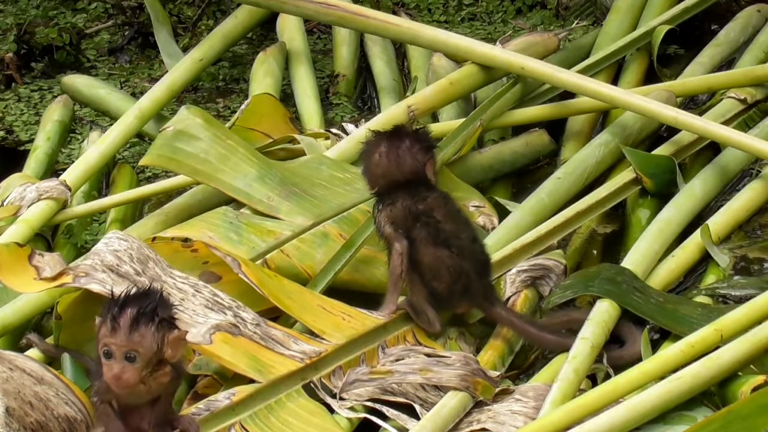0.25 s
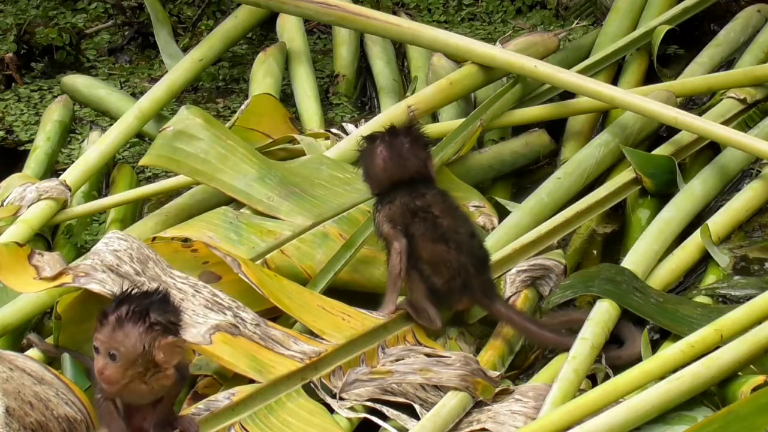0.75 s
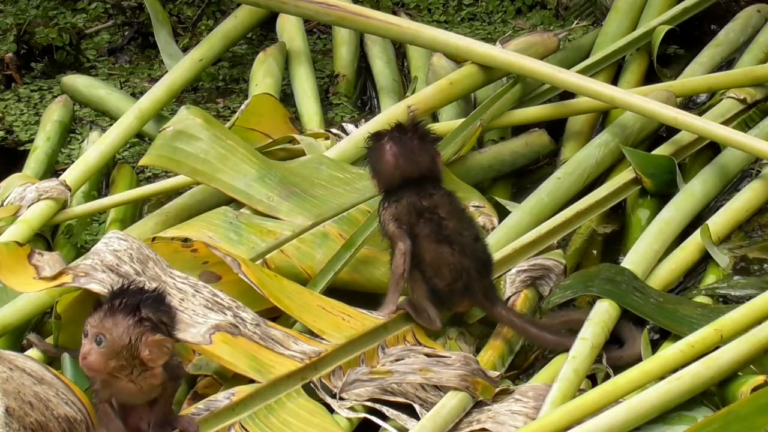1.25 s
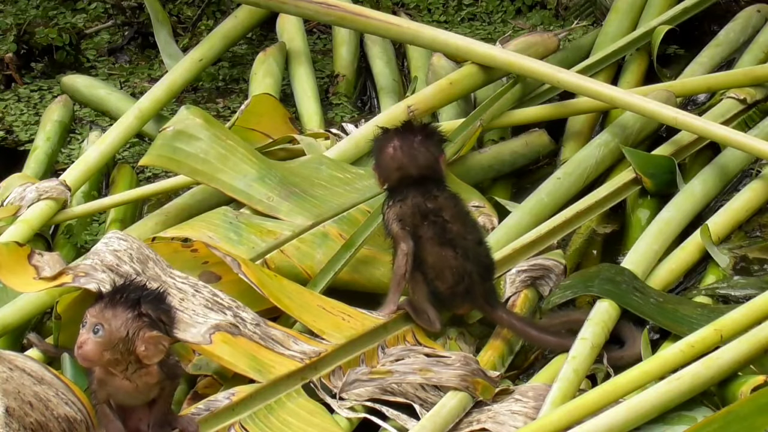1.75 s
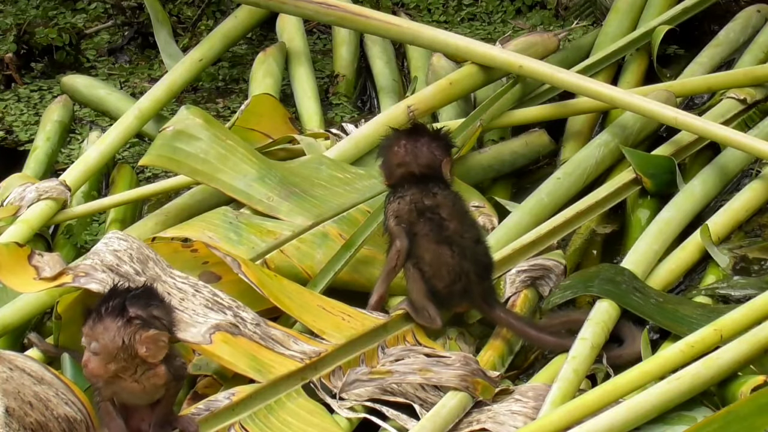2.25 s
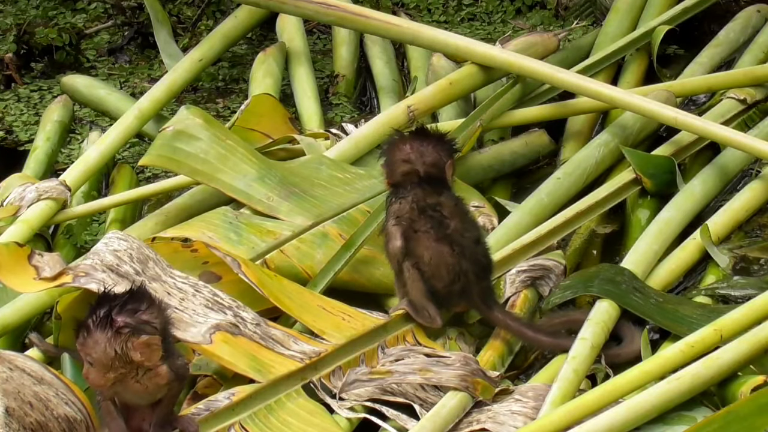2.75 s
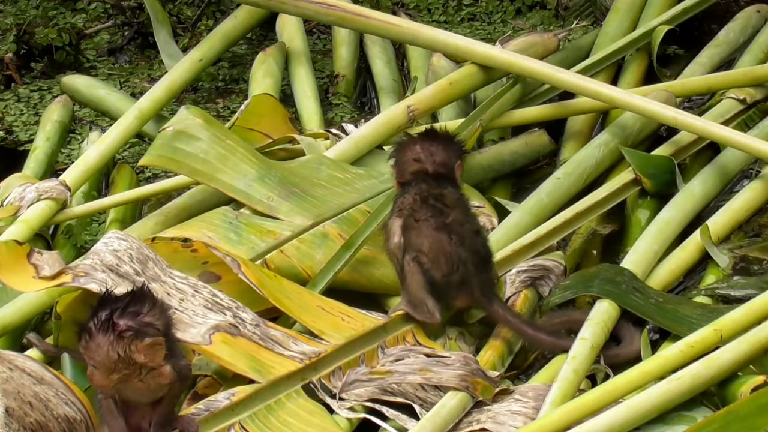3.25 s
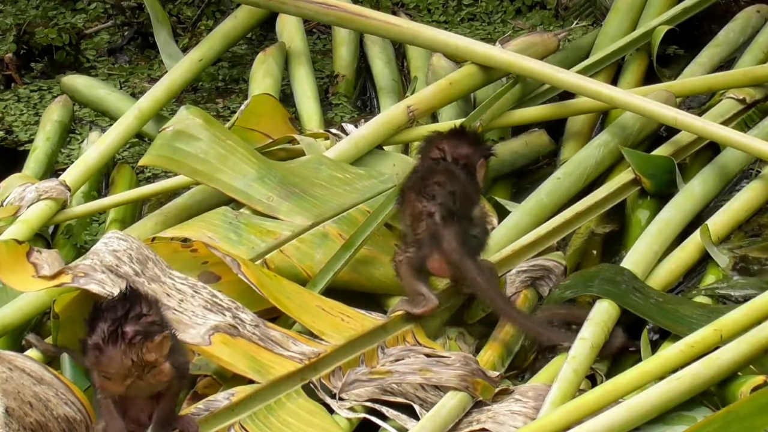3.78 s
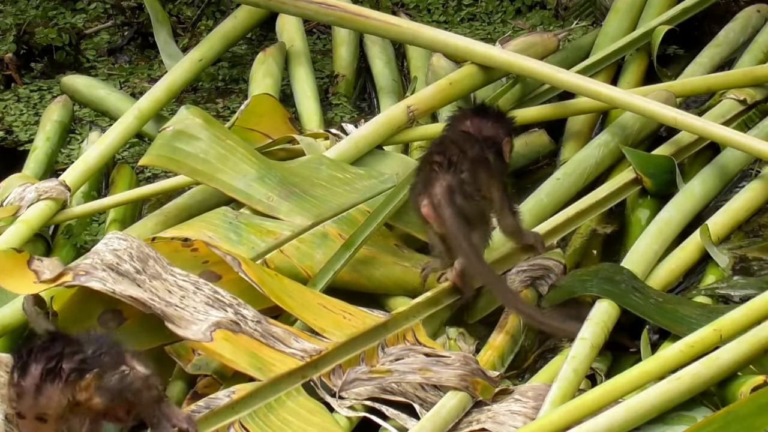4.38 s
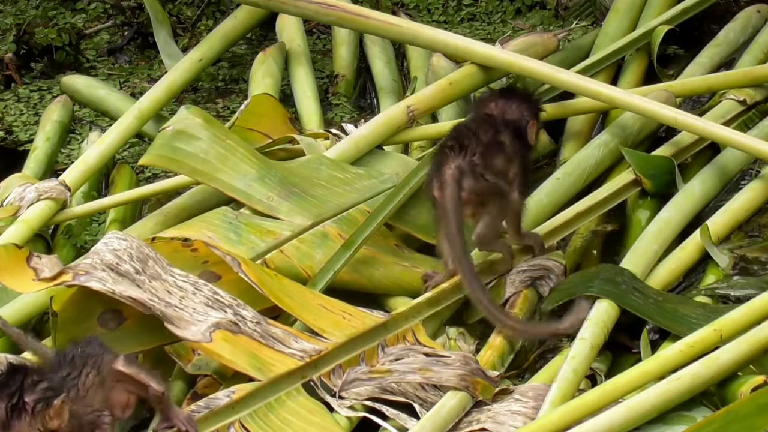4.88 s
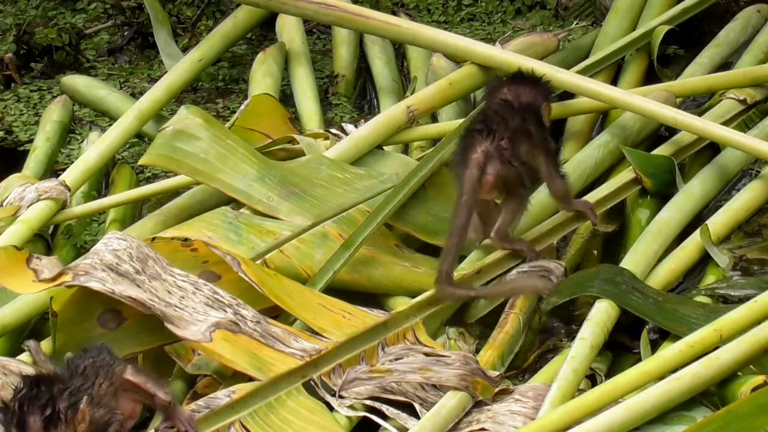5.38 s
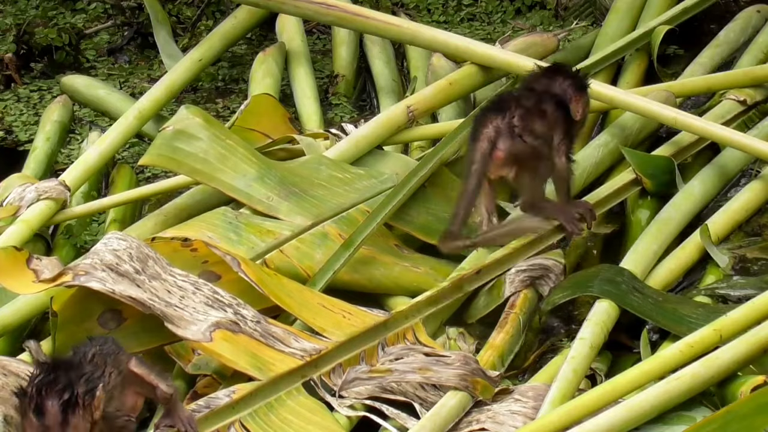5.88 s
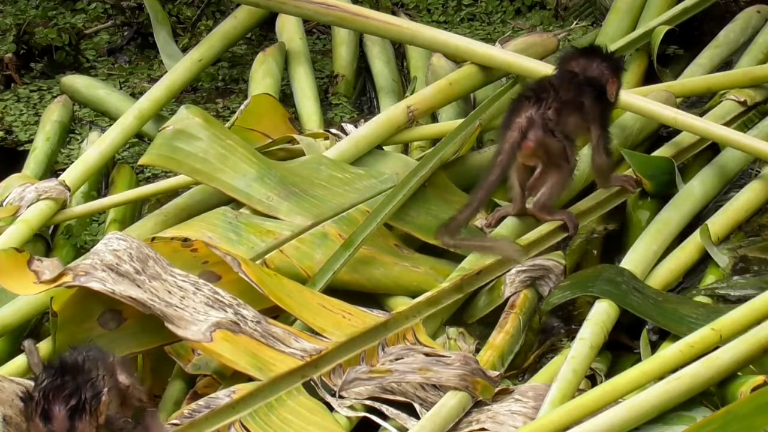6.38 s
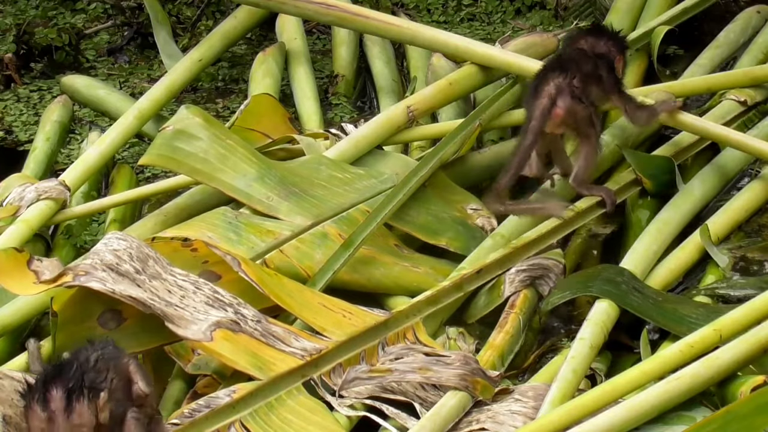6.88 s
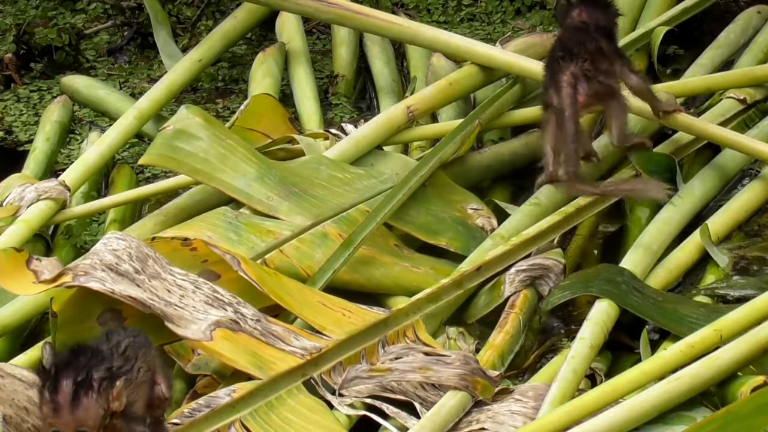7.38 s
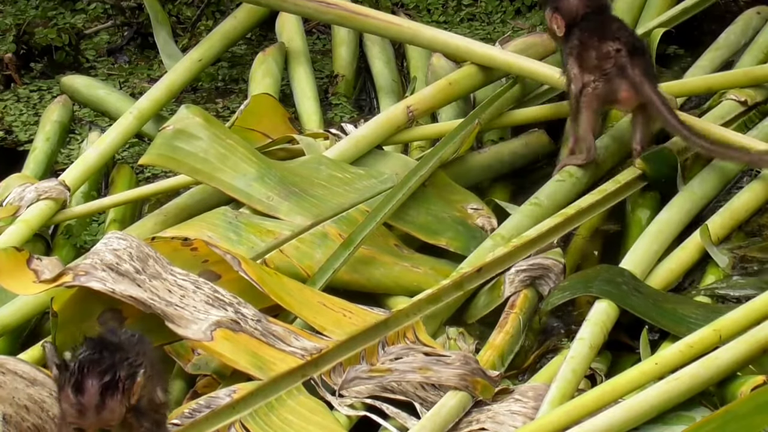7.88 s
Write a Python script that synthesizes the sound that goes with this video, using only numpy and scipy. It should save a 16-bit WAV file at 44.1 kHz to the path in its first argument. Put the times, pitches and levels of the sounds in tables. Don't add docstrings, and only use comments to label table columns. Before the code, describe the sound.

A pondside bed of distant low rumble, faint air hiss, thin high insect buzz with a fast throb, and a dim frog chorus runs throughout, heard by a small stereo camera microphone. Tiny chirps, leaf snaps and soft water gulps open it; from 0.5 to 1.0 a young monkey gives a smooth whistled cry, rising then dropping. At 2.1 comes a double-peaked squeak falling hoarsely. Leaves brush near 2.8, drops gulp near 3.3, and quick yelps follow at 3.35 and 3.7. Strong leaf snaps at 4.2, soft coos at 4.1 and 4.4, a yelp at 4.45. Twigs and leaves crackle from 4.9 to 5.2. A small yip at 5.6 precedes a loud arched squeal at 5.8. Low coos and a grunt fill 6.6 to 7.0, then a piercing short squeal at 7.1 cracks into a sob. Light rustles continue, with a clipped rising yelp at 8.1. Short echoes trail the calls.

```python
import sys
import numpy as np
from scipy import signal
from scipy.fft import rfft, irfft
from scipy.io import wavfile
from scipy.ndimage import uniform_filter1d

SR = 44100
rng = np.random.default_rng(int(sys.argv[2]) if len(sys.argv) > 2 else 0)


def volts_from_db(level):
    exponent = np.asarray(level, float) / 20
    return 10 ** exponent


def to_wav(s):
    ch = np.atleast_2d(s).T
    pcm = np.round(np.clip(ch, -1, 1) * 32767)
    wavfile.write(sys.argv[1], SR, pcm.astype(np.int16))


N = 358533


def rms_one(x):
    return x / np.sqrt(np.mean(x ** 2) + 1e-20)


def in_time(rows):
    s, *columns = np.transpose(rows)
    return [np.interp(np.arange(N) / SR, s, c) for c in columns]


def at_hz(points, hz):
    points = np.array(points)
    return np.interp(np.log(hz), np.log(points[:, 0]), points[:, 1])


def drift(rate_hz):
    r = np.exp(-2 * np.pi * rate_hz / SR)
    return rms_one(signal.lfilter([1], [1, -2 * r, r * r], rng.standard_normal(N + SR))[SR:])


# freq_hz, likeness (0-1)
LIKENESS = [(30, 0.85), (150, 0.94), (300, 0.7), (700, 0.34), (2000, 0.94), (6000, 1), (9000, 0.66),
            (12000, 0.031), (15500, 0.12)]
# freq_hz, left_over_right_db
LEAN = [(30, -4), (125, -3.5), (250, -2), (500, -1), (1200, 2.7), (3000, 2.5), (6000, -1.5), (12000, -1)]


def coloured(spectrum):
    hz = np.maximum(np.arange(N // 2 + 1) * SR / N, 5)
    mid, side = rfft(rng.standard_normal((2, N)))
    alike = np.clip(at_hz(LIKENESS, hz), 0, 1)
    lean = volts_from_db(at_hz(LEAN, hz) / 2)
    mid, side = np.sqrt(1 + alike) * mid, np.sqrt(1 - alike) * side
    pair = [(mid + side) * lean, (mid - side) / lean]
    inside = (hz > spectrum[0][0]) & (hz < spectrum[-1][0])
    return rms_one(irfft(pair * volts_from_db(at_hz(spectrum, hz)) * inside, N))


def buzz(hz, width_hz):
    phase = 2 * np.pi * np.cumsum(hz + np.zeros(N)) / SR
    return rms_one(drift(width_hz) * np.cos(phase) + drift(width_hz) * np.sin(phase))


def unfold(calls, way):
    return [[(s + share * length, bend * (start_hz + share * (end_hz - start_hz)), db + effort_db, pressed)
             for share, bend, effort_db, pressed in way]
            for s, length, start_hz, end_hz, db in calls]


# start_s, pitch_hz, effort_db, pressed_db_per_octave
WHISTLE = [(.475, 1208, -48.5, -16), (.55, 1219, -48, -7), (.62, 1337, -47.5, 4.5), (.66, 1380, -42.5, -5),
           (.7, 1491, -40, 2), (.8, 1526, -36, 3.5), (.9, 1549, -35, 0), (.96, 1513, -40.5, 3),
           (1.0, 1306, -56, -8)]
# freq_hz, gain_db
PURSED = [(1400, -0.5), (3000, -1.5), (4650, -6), (5300, -17), (6100, -26), (7700, -16), (9200, -28.5),
          (10800, -18), (12300, -23)]


def whistle():
    return [(WHISTLE, PURSED)]


# start_s, pitch_hz, effort_db, pressed_db_per_octave
SCREAMS = [
    [(2.122, 2750, -54, 5), (2.145, 3274, -38, -4), (2.17, 2334, -37, 3.5), (2.204, 3420, -30, -0.5),
     (2.22, 2930, -30, 7), (2.24, 2572, -29.5, 2.5), (2.263, 2410, -28.5, 8), (2.285, 1776, -31, 1),
     (2.31, 954, -51.5, -33)],
    [(5.79, 1816, -45, -10), (5.8, 2560, -37.5, -0.5), (5.825, 3070, -30.5, 4), (5.838, 2687, -27, 10),
     (5.858, 2775, -22, 6), (5.876, 2702, -29, 0), (5.893, 2150, -26.5, 6.5), (5.935, 1436, -37, -1),
     (5.973, 1153, -42.5, -13)],
    [(7.084, 886, -57.5, 3), (7.1, 2432, -30.5, -8), (7.109, 2753, -33, -8), (7.125, 2767, -28, 6.5),
     (7.14, 3104, -22, -2), (7.153, 3137, -24, -11), (7.163, 3186, -24, -5), (7.174, 2330, -36, 2),
     (7.19, 1425, -29, 12)],
]
# freq_hz, gain_db
SCREAM_MOUTHS = [
    [(1200, -15), (2500, -2), (3400, 13), (5200, -5.5), (7700, 8), (9000, 2), (10200, 2.5), (12500, 0.5)],
    [(1200, -6), (2800, 4), (4200, 3.5), (5400, -3), (8200, 5.5), (9600, -8), (11200, 2), (12500, -6)],
    [(1200, 3), (2300, -3.5), (3100, 1.5), (5400, -7), (6300, 12.5), (8300, -2.5), (11200, -4), (13500, -8)],
]


def screams():
    return list(zip(SCREAMS, SCREAM_MOUTHS))


# start_s, pitch_hz, effort_db, pressed_db_per_octave
YELPS = [
    [(3.329, 2660, -36, 7), (3.333, 2730, -26, 11), (3.337, 3070, -46, 6), (3.341, 3760, -24, -6),
     (3.346, 3470, -34, -10), (3.354, 3250, -52, -12)],
    [(3.358, 2130, -22.5, 19), (3.372, 1554, -47.5, -8), (3.39, 893, -42, 3)],
    [(3.402, 2684, -36, -4), (3.412, 2943, -33, -8), (3.42, 2373, -31, 11), (3.428, 1754, -37.5, -6),
     (3.44, 1217, -37.5, -6.5), (3.455, 905, -45, -29)],
    [(3.702, 874, -44, -23), (3.72, 722, -44, -11), (3.74, 1520, -51, -14), (3.758, 2190, -42.5, 0),
     (3.77, 1840, -40.5, -2.5), (3.785, 1200, -51, -23)],
    [(4.425, 2012, -45, 3), (4.445, 1795, -42, -5), (4.455, 1930, -38, 5), (4.464, 2695, -30.5, -3.5),
     (4.474, 2730, -36, 0), (4.485, 2325, -28.5, -3), (4.5, 1930, -34, 6), (4.52, 1185, -40, -9),
     (4.538, 830, -44, -37)],
    [(8.112, 896, -53.5, -11), (8.123, 2150, -44.5, -2), (8.13, 2540, -37, 2)],
]
# freq_hz, gain_db
YELP_MOUTHS = [
    [(1200, -6), (2700, -1), (3700, 2), (5500, 7), (7000, -2), (8300, 13), (11000, -7), (12500, -12)],
    [(1000, -5), (2000, -3.5), (4100, 2.5), (6000, -4), (8200, 6), (9600, -7), (11000, -12), (12500, -18)],
    [(1000, -1.5), (2000, -3), (2900, 0), (4300, 7), (5700, -0.5), (8400, 12), (10000, -8), (12500, -6)],
    [(800, 0), (2100, 7), (4200, 5), (5200, -21), (8000, 6), (9600, 3), (11000, 4), (12500, -10)],
    [(1000, -3), (2600, 1), (4300, 5), (5600, -14), (7600, 10.5), (9200, 1.5), (10800, 3), (12500, -8)],
    [(1200, -8), (2500, 4), (3800, -9), (5000, -23), (7600, 12), (9600, 5), (11500, 10), (14000, -2)],
]


def yelps():
    return list(zip(YELPS, YELP_MOUTHS))


# start_s, pitch_hz, effort_db, pressed_db_per_octave
SOB = [(7.195, 1427, -38, -4), (7.207, 1254, -38.5, 10), (7.23, 1446, -38.5, 2.5), (7.245, 1260, -48, -4),
       (7.26, 990, -55, -14)]
# start_s, length_s, start_hz, end_hz, effort_db
CHIRPS = [(.334, 0.0166, 1330, 1300, -53), (4.388, 0.0247, 2310, 2700, -49.5),
          (7.938, 0.015, 3480, 3750, -54), (.107, 0.013, 940, 1000, -53), (6.39, 0.013, 2400, 1900, -58.5)]
# length_share, pitch_ratio, effort_db, pressed_db_per_octave
CHIRP_WAY = [(0, 1.0, 4, -1), (.5, 1.1, -3, 5.5), (1, 1.0, -2.5, -14)]
# freq_hz, gain_db
THROAT = [(1200, 3.5), (2800, 1), (4000, 3), (4700, -5), (5900, -11), (8000, 5.5), (9600, -4), (11000, -8),
          (15500, -30)]
LIPS = [.8, 1.3, 1.04, 1.05, 0.96, 1.3]


def sob_and_chirps():
    mouths = [np.array(THROAT) * [ratio, 1] for ratio in LIPS]
    return list(zip([SOB] + unfold(CHIRPS, CHIRP_WAY), mouths))


# start_s, pitch_hz, effort_db, pressed_db_per_octave
YIP = [(5.573, 1710, -51.5, -4), (5.59, 1398, -42, 4), (5.61, 1470, -41.5, -0.5), (5.62, 1330, -45, 7),
       (5.63, 1090, -57, -4)]
# freq_hz, gain_db
BARED = [(1400, -2), (2800, -11), (4300, -11), (6000, -26), (8000, 3), (9300, 5), (11000, -6), (15500, -36)]
# start_s, length_s, start_hz, end_hz, effort_db
GRUNTS = [(6.894, 0.054, 1520, 1318, -45)]
# length_share, pitch_ratio, effort_db, pressed_db_per_octave
GRUNT_WAY = [(0, 1.0, 1.5, -0.14), (.27, .905, 3.5, -0.097), (.76, 1.04, 0.5, -.5), (1, .97, 0, -1.3)]
# freq_hz, gain_db
AJAR = [(1400, -4), (2800, -11), (4300, -16.5), (5500, -22), (7800, -2), (9500, -19), (15500, -24)]


def yip_and_grunt():
    return list(zip([YIP] + unfold(GRUNTS, GRUNT_WAY), (BARED, AJAR)))


# start_s, length_s, start_hz, end_hz, effort_db
COOS = [(4.137, 0.071, 668, 641, -51.5), (4.397, 0.067, 666, 680, -51), (6.616, 0.085, 643, 582, -48.5),
        (6.792, 0.144, 604, 640, -49), (7.016, 0.049, 696, 657, -48.5)]
# length_share, pitch_ratio, effort_db, pressed_db_per_octave
COO_WAY = [(0, 0.99, 4.5, -2.5), (.42, 0.93, 2, 1), (1, 1.0, -10, -5)]
# freq_hz, gain_db
SHUT = [(600, -1), (1200, -3.5), (1800, -59), (3000, -26.5), (7800, -16), (15500, -45)]


def coos():
    return [(rows, SHUT) for rows in unfold(COOS, COO_WAY)]


# centre_s, half_length_s
BREAKS = [(3.366, 0.01), (4.511, 0.0073), (5.915, 0.0183), (7.195, 0.015)]


def sing(rows, mouth, ragged, shake, breath, flutter, turn):
    jitter, hoarse_db, half_db = 0.0066, -3, -24
    edge_s, port_turn_rad = 0.00062, 0.99
    breath_hz = 7600
    knee = 2.64
    roll_off_db_per_octave, glide_loss_db = 4.5, 1.58
    top_hz, top_loss_db_per_khz = 12500, 5
    flutter_db, ragged_db = 1.6, 7

    s, hz, effort_db, pressed = np.transpose(rows)
    span = np.arange(int(s[0] * SR), min(int((s[-1] + edge_s) * SR), N))
    t = span / SR
    pitch = uniform_filter1d(np.interp(t, s, hz), size=330, mode="nearest")
    strain = np.clip(np.abs(np.gradient(np.log(pitch)) * SR) / 12, .06, 1)
    crack = sum(np.exp(-((t - at) / length) ** 4) for at, length in BREAKS)
    wobble = (jitter * strain + 0.07 * crack) * shake[span]
    phase = 2 * np.pi * np.cumsum(pitch * (1 + wobble)) / SR

    order = np.arange(1, 12)[:, None]
    slope = np.interp(t, s, pressed)
    colour = at_hz(mouth, order * pitch) + slope * np.log2(np.minimum(order, knee))
    colour = colour - roll_off_db_per_octave * np.log2(np.maximum(order / knee, 1))
    colour = colour - glide_loss_db * order * strain
    if ragged > 0:
        colour = colour - top_loss_db_per_khz * np.maximum(order * pitch - top_hz, 0) / 1000
    effort = np.interp(t, s, effort_db)
    even = effort - 10 * np.log10(np.sum(volts_from_db(2 * colour), axis=0))

    hiss_db = even + at_hz(mouth, breath_hz) + hoarse_db
    hiss_db = hiss_db + slope * np.log2(np.minimum(breath_hz / pitch, knee))
    puffs = 1 + 0.1 * np.cos(phase)
    voice = volts_from_db(hiss_db - 14) * (strain + 0.21 * crack) * breath[:, span] * puffs
    voice = voice + volts_from_db(effort + half_db) * np.minimum(crack, 1) * np.sin(phase / 2)

    apart = np.array([[.5], [-.5]])
    for k in range(1, 12):
        late = span - k * SR // 10
        unrest = 0.029 + 0.88 * min(k, knee) * strain
        db = even + colour[k - 1] + flutter_db * unrest * flutter[k % 4][span]
        db = db + (k > 1) * ragged * ragged_db * shake[late] + (k > 3) * 4.2 * turn[late]
        shift = apart * port_turn_rad * (k * pitch / 12000) ** 3 * turn[span]
        level = np.sqrt(2) * volts_from_db(db + apart * at_hz(LEAN, k * pitch))
        voice = voice + level * np.sin(k * phase + k * k + shift) * (k * pitch < 15000)
    edges = np.clip(np.minimum(t - s[0], s[-1] + edge_s - t) / edge_s, 0, 1)
    return span, voice * edges


# start_s, level_db
FAINT_COO = [(.515, -69), (.53, -55), (.56, -47), (.58, -79)]


def faint_coo():
    t = np.arange(N) / SR
    level = volts_from_db(in_time(FAINT_COO)[0]) * (t > FAINT_COO[0][0]) * (t < FAINT_COO[-1][0])
    return level * (np.sin(2 * np.pi * 1850 * t) + 0.62 * np.sin(2 * np.pi * 3085 * t))


RAGGED = [.55, .35, .2, .15, .5, .35, .55, .55, .2, .5, .3, .5, .3, .2, .2]


def monkeys():
    out = np.zeros((2, N))
    shake, turn = drift(288), drift(39)
    flutter = [drift(74) for k in range(4)]
    breath = coloured([(2500, -23), (5000, -30), (7500, 0), (11000, 8), (15500, -4)])
    wide = screams() + yelps() + sob_and_chirps()
    calls = [(rows, mouth, ragged) for (rows, mouth), ragged in zip(wide, RAGGED)]
    calls += [(rows, mouth, .2) for rows, mouth in yip_and_grunt()]
    calls += [(rows, mouth, 0) for rows, mouth in whistle() + coos()]
    for rows, mouth, ragged in calls:
        span, voice = sing(rows, mouth, ragged, shake, breath, flutter, turn)
        out[:, span] += voice
    return out + faint_coo()


# peak_s, level_db, length_s
SWISH = [(0.563, -52.5, 0.0087), (0.64, -54, 0.014), (.345, -63, 0.011), (2.713, -52.5, 0.021),
         (2.862, -52, 0.013), (3.175, -53, 0.016), (3.694, -62, 0.029), (3.753, -52.5, 0.029),
         (3.908, -64, 0.023), (4.047, -56.5, 0.02), (4.205, -56.5, 0.057), (4.273, -50, 0.019),
         (4.646, -54, 0.046), (4.83, -57.5, 0.035), (4.943, -57, 0.029), (5.016, -49, 0.023),
         (5.058, -57, 0.028), (5.096, -46.5, 0.015), (5.144, -44.5, 0.02), (5.304, -64, 0.098),
         (5.62, -46.5, 0.031), (5.692, -54, 0.013), (6.29, -61, 0.014), (6.392, -65, 0.061),
         (6.752, -63, 0.31), (7.225, -49, .035), (7.612, -64, 0.018), (7.761, -47.5, 0.036),
         (7.972, -55, 0.033), (8.068, -60, 0.037)]
# freq_hz, level_db_per_hz
LEAF = [(710, 3.5), (1200, -1), (1590, -12.5), (2680, -7.5), (3730, -8), (5150, -11.5), (7170, 0),
        (8420, 3), (15500, -16.5)]


def swishes(grains_per_s=2500, grain_db=5.5):
    t = np.arange(N) / SR
    level = sum(volts_from_db(db) * np.exp(-((t - s) / length) ** 2) for s, db, length in SWISH)
    grain_level = volts_from_db(grain_db * np.minimum(rng.exponential(1, N), 4))
    grains = (rng.random(N) < grains_per_s / SR) * grain_level
    density = signal.lfilter([1], [1, -.97], grains)
    return level * rms_one(coloured(LEAF) * np.sqrt(0.49 + density))


# start_s, peak_db, low_part_db
SNAPS = [(.107, -52, 8), (.334, -46, 7), (.346, -48, 9), (6.431, -52, 6), (0.4556, -42, -8),
         (0.57, -36, -3), (0.632, -47, 1), (0.961, -36.5, -9), (3.147, -34, -7), (4.032, -36, -8),
         (4.193, -45, -15), (4.207, -40, -8), (4.228, -47, -15), (4.237, -48, -12), (4.311, -41, -4),
         (6.381, -44, -15), (6.39, -41, 2), (5.696, -42, -20), (8.051, -46, 8), (0.499, -42, 3),
         (4.214, -23.5, -14.5), (4.256, -36.5, -2), (5.005, -30, -19), (5.083, -32.5, 5),
         (5.1374, -20.5, -6), (5.1822, -30, -9), (5.687, -26.5, -25), (6.359, -39, -4), (6.761, -40, -22),
         (6.776, -35, -7), (7.446, -57, -11), (7.612, -40, -4), (7.698, -38.5, -3), (7.823, -34, -22),
         (8.02, -40, -2)]


def snaps(decay_s=0.0033):
    out = np.zeros((2, N))
    high = coloured([(4000, -14.0), (7500, 15.5), (10000, 10.0), (15800, -19.0)])
    low = coloured([(700, 19.5), (2000, -7), (4500, 12.0)])
    after = np.arange(int(8 * decay_s * SR)) / SR
    shape = np.minimum(after / decay_s / 0.34, 1) * np.exp(-after / decay_s)
    for s, db, low_db in SNAPS:
        span = slice(int(s * SR), int(s * SR) + len(after))
        out[:, span] += volts_from_db(db - 9) * shape * (high[:, span] + volts_from_db(low_db) * low[:, span])
    return out


# start_s, peak_db
TICKS = [(4.9025, -32), (5.009, -42), (5.029, -51), (5.044, -47), (5.123, -45), (5.141, -38), (5.183, -41),
         (5.274, -44.5), (4.257, -46), (7.449, -50)]


def ticks(decay_s=0.0013):
    out = np.zeros((2, N))
    crisp = coloured([(1000, -13), (4000, -6), (5200, -11), (8000, 1), (15800, -6)])
    after = np.arange(int(0.0264 * SR)) / SR
    for s, db in TICKS:
        span = slice(int(s * SR), int(s * SR) + len(after))
        out[:, span] += volts_from_db(db) * np.exp(-after / decay_s) * crisp[:, span]
    return out


# start_s, peak_db, pitch_hz
GULPS = [(0.352, -59, 483), (0.414, -55, 495), (0.482, -53, 452), (0.557, -52, 455), (0.629, -56, 517),
         (3.264, -61, 640), (3.292, -50.5, 403), (2.95, -59, 520), (3.052, -63.5, 900), (5.606, -51.5, 547),
         (5.675, -54, 344), (5.786, -65, 790)]


def gulps(ring_s=0.0069, fall=0.36):
    out = np.zeros(N)
    after = np.arange(int(.06 * SR)) / SR
    for s, db, hz in GULPS:
        phase = 2 * np.pi * np.cumsum(hz * (1 + fall * np.exp(-after / ring_s))) / SR
        shape = after / ring_s * np.exp(-after / ring_s)
        start = int(s * SR)
        out[start:start + len(after)] += volts_from_db(db + 18.5) * shape * np.sin(phase)
    return out


# start_s, level_db, start_hz,
# end_hz, length_s
BIRDS = [(2.121, -42, 3640, 3890, 0.0087), (3.569, -57, 2355, 2220, 0.029), (3.948, -63, 2340, 2260, 0.04),
         (5.373, -58.5, 1570, 1460, 0.015), (6.429, -46, 2320, 3030, 0.0052),
         (7.084, -39, 2490, 2370, 0.0087), (7.443, -60, 2170, 2070, 0.029), (6.129, -65, 3000, 3000, 0.043),
         (6.178, -61, 3020, 2980, .02), (6.205, -61, 2840, 2800, 0.059), (6.26, -66, 3050, 2950, .05),
         (7.22, -46, 2860, 2780, 0.024)]


def birds():
    out, waver, flicker = np.zeros(N), drift(100), drift(32)
    for s, db, start_hz, end_hz, length in BIRDS:
        span = np.arange(int(s * SR), int((s + length) * SR))
        hz = np.linspace(start_hz, end_hz, len(span)) * (1 + 0.025 * waver[span])
        phase = 2 * np.pi * np.cumsum(hz) / SR
        out[span] += volts_from_db(db + 4.9 * flicker[span]) * np.hanning(len(span)) ** 0.23 * np.sin(phase)
    return out


# start_s, length_s, start_hz, end_hz, level_db
CICADA = [(-.1, 0.68, 5880, 6140, -67), (0.504, 0.4, 5840, 6150, -67), (0.999, 0.48, 5870, 6290, -69),
          (1.556, 0.83, 5770, 6180, -61.5), (2.2, 0.37, 6200, 6230, -65), (2.63, 0.89, 5830, 5650, -67.5),
          (3.45, 1.6, 5910, 5940, -63), (4.95, 1.44, 5980, 5820, -65.5), (6.42, 0.62, 5800, 6030, -66),
          (7.2, 0.81, 5870, 5620, -69)]


def cicada(swell_s=0.17, fade_s=0.24, rest_db=-71):
    t = np.arange(N) / SR
    glide, level_db = [], rest_db
    for s, length, start_hz, end_hz, db in CICADA:
        glide += [(s, start_hz), (s + length, end_hz)]
        swell = np.minimum((t - s) / swell_s, (s + length - t) / fade_s)
        level_db = level_db + (db - rest_db) * np.clip(swell, 0, 1)
    hz, = in_time(glide)
    return volts_from_db(level_db + 5.4 * drift(3.55)) * buzz(hz + 70 * drift(2.6), width_hz=140)


def cricket():
    throb = np.sin(2 * np.pi * np.cumsum(9.1 + 0.84 * drift(0.5)) / SR - 1.2)
    pulse = np.clip(0.85 + 0.25 * throb, 0, 2)
    return volts_from_db(-68 + 1.0 * drift(3.3)) * pulse * buzz(7340, width_hz=85)


def katydids():
    return volts_from_db(-99.0 + 12.0 * drift(2.1)) * buzz(8400, width_hz=230)


# start_s, level_db
FROGS = [(0, -88), (.33, -67.5), (2.0, -72), (2.5, -66), (3.5, -71.5), (4.35, -66), (5.3, -72.5),
         (6.8, -74), (7.5, -98), (7.62, -63), (8.13, -64.5)]


def frogs():
    level = volts_from_db(in_time(FROGS)[0] - 2 + 3 * drift(9))
    return level * (buzz(2030, width_hz=150) + .6 * buzz(4250, width_hz=200))


# start_s, level_db
RUMBLE = [(0.0, -36.5), (2.08, -37.5), (7.61, -37.5), (8.13, -36.5)]
# freq_hz, level_db_per_hz
LOW = [(12, -66), (20, -7), (34, -23), (57, -1), (107, -3.5), (146, -0.5), (229, -7.5), (285, -13),
       (401, -20), (619, -27), (665, -27.5), (1500, -42.5), (1950, -57), (3300, -120)]


def rumble():
    return volts_from_db(in_time(RUMBLE)[0]) * coloured(LOW)


# freq_hz, level_db_per_hz
AIR = [(710, 4.5), (1200, -8.5), (1620, -7), (1950, 0), (2780, -7.5), (4060, -5.5), (5150, -12.5),
       (7350, -4.5), (7840, -3), (14800, -13), (15800, -5)]


def air(level_db=-62):
    return volts_from_db(level_db + .7 * drift(0.43)) * coloured(AIR)


def thicket(x, t60_s=0.16, first_s=0.00037, wet_db=-5.0, alike=0.91, bank_t60_s=0.3, bank_db=-8):
    after = np.arange(int(.4 * SR)) / SR
    sparse = rng.random((3, len(after))) < .2
    shared, *own = rng.standard_normal((3, len(after))) * sparse
    echoes = shared * np.sqrt(alike) + np.array(own) * np.sqrt(1 - alike)
    echoes = echoes * volts_from_db(-60 * after / t60_s) * np.clip(after / first_s - .3, 0, 1)
    stalk_band = signal.butter(2, [2000, 11000], "band", fs=SR, output="sos")
    echoes = signal.sosfilt(stalk_band, echoes)
    bank_band = signal.butter(1, [2500, 3300], "band", fs=SR, output="sos")
    bank = signal.sosfilt(bank_band, shared[::-1] * volts_from_db(bank_db - 60 * after / bank_t60_s))
    echoes = echoes + bank * np.clip(after / 0.018, 0, 1)
    echoes = echoes / np.sqrt(np.mean(np.sum(echoes ** 2, axis=1)))
    return x + volts_from_db(wet_db) * signal.fftconvolve(x, echoes, axes=1)[:, :N]


def scene():
    near = swishes() + snaps() + ticks() + gulps()
    far = cicada() + cricket() + katydids() + frogs() + rumble() + air()
    return thicket(monkeys() + birds()) + near + far


def gain_control(x, knee_db=-34, share=0.13, release_db_per_s=13.0):
    t = np.arange(N) / SR
    level = 10 * np.log10(uniform_filter1d(np.mean(x ** 2, axis=0), size=2000) + 1e-12)
    held = np.maximum.accumulate(level + release_db_per_s * t) - release_db_per_s * t
    return volts_from_db(-share * uniform_filter1d(np.maximum(held - knee_db, 0), size=2000))


def band_limit(x):
    return signal.sosfilt(signal.butter(12, 16010, fs=SR, output="sos"), x)


def record(dry):
    top_cut = signal.cheby2(24, 50, 15660, fs=SR, output="sos")
    mix = signal.sosfilt(top_cut, dry * gain_control(dry))
    return band_limit(mix)


dry = scene()
out = record(dry)
to_wav(out)
```